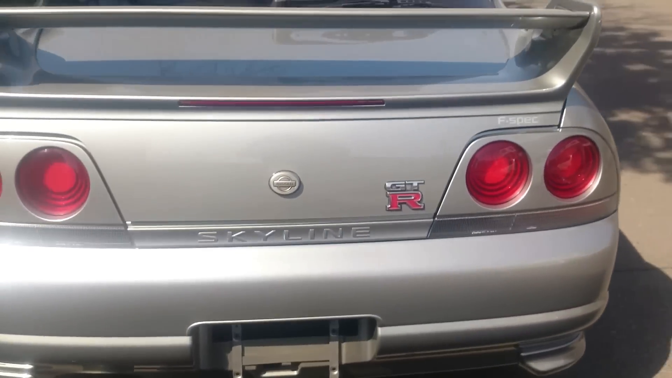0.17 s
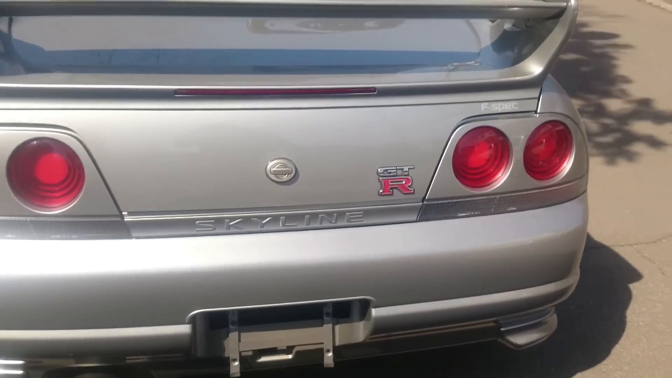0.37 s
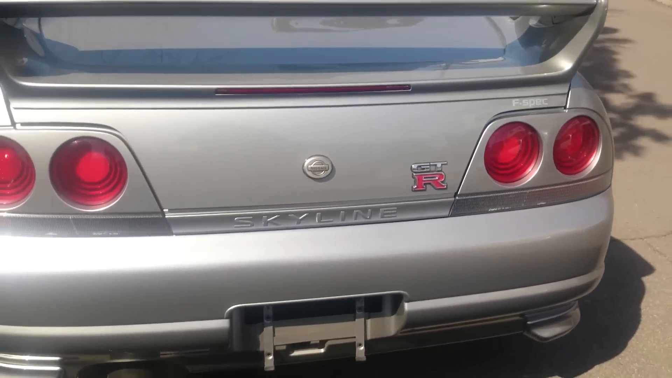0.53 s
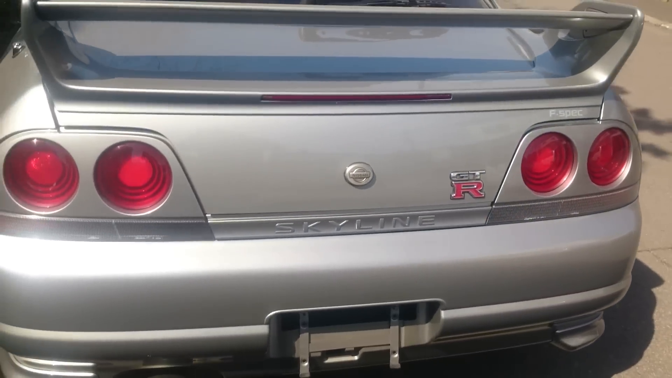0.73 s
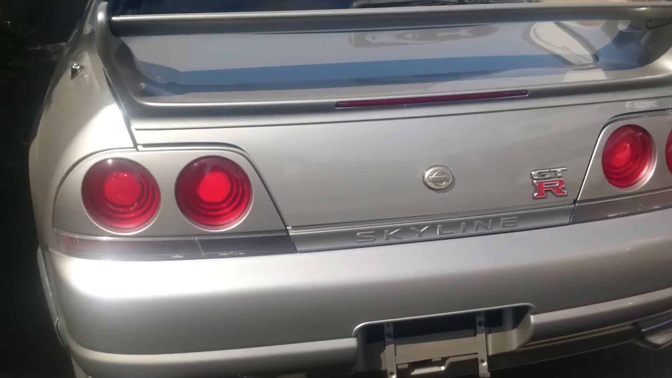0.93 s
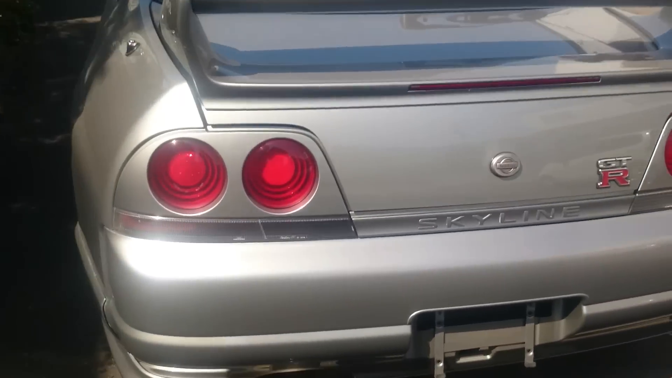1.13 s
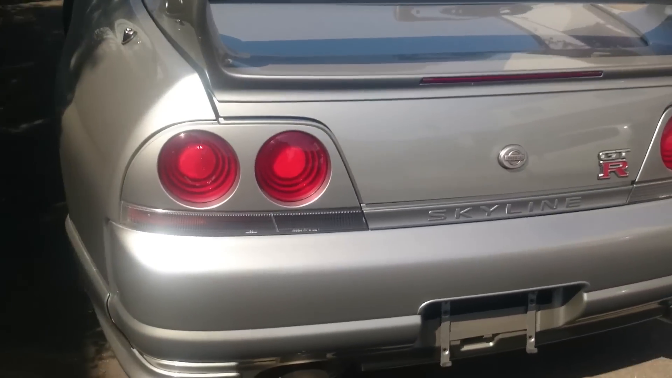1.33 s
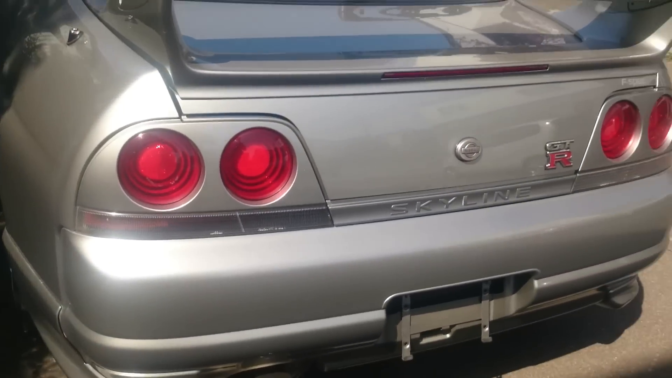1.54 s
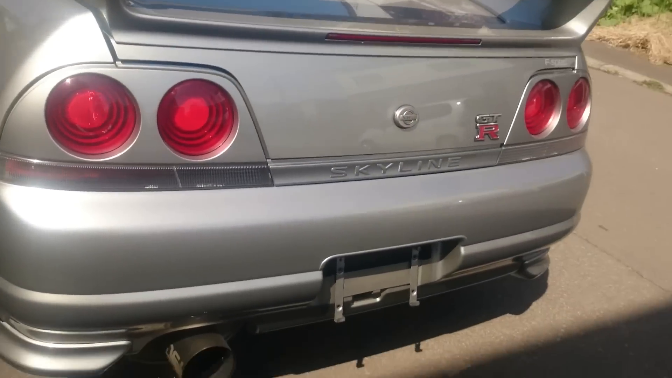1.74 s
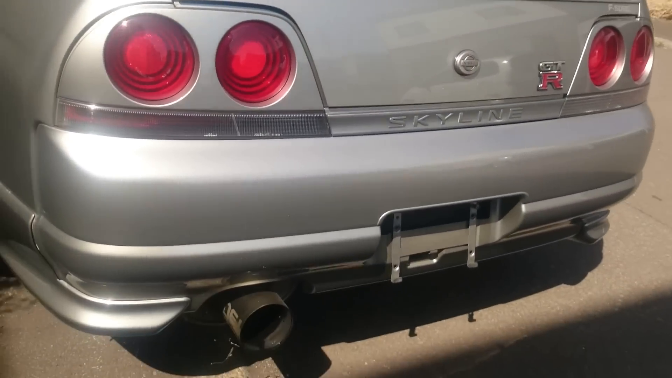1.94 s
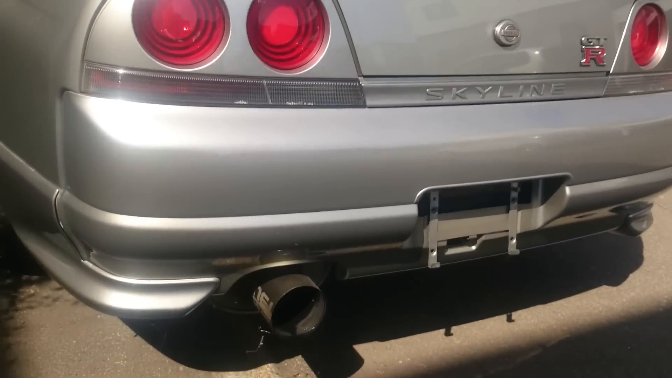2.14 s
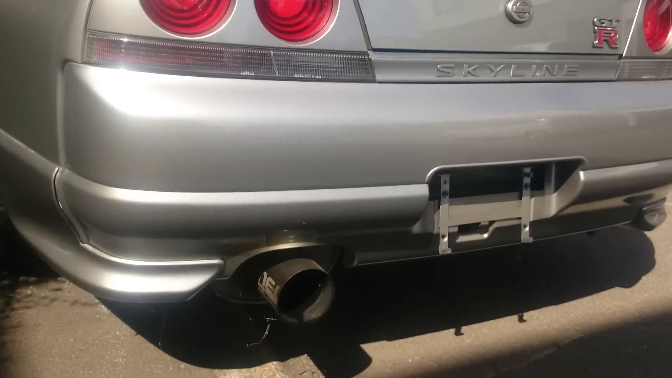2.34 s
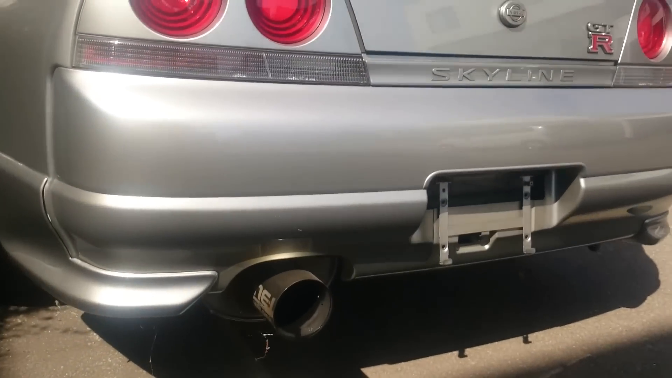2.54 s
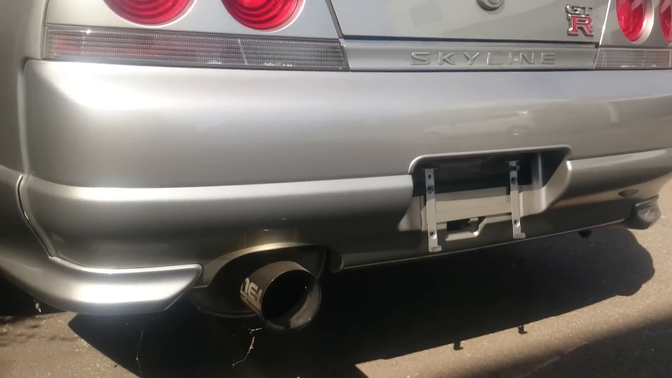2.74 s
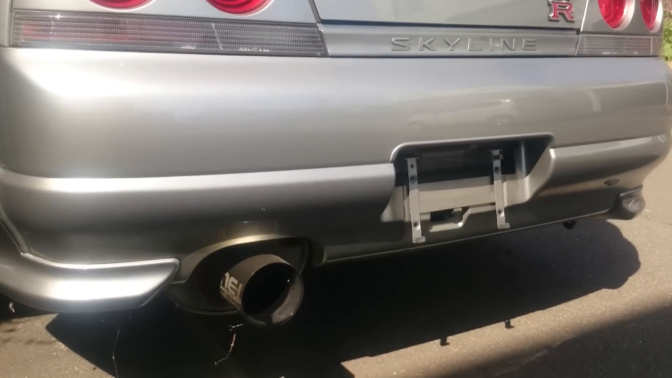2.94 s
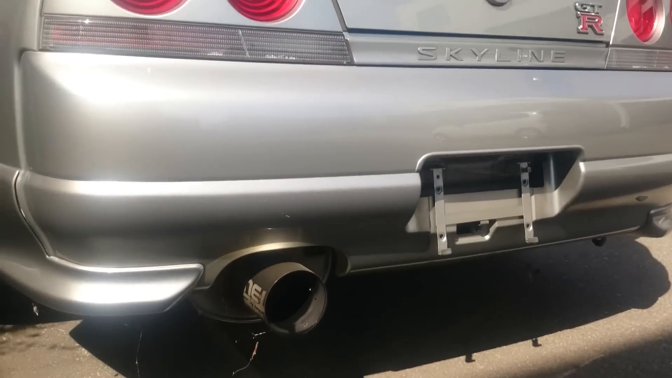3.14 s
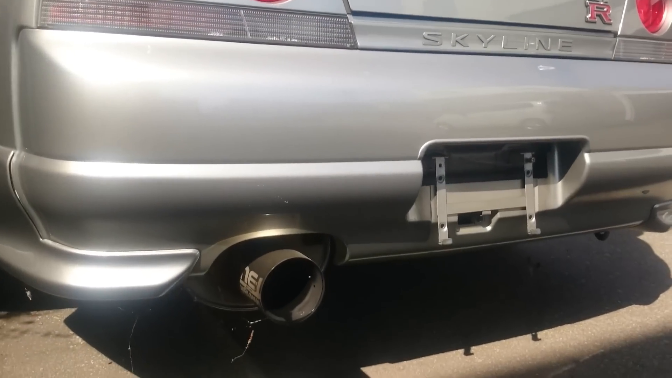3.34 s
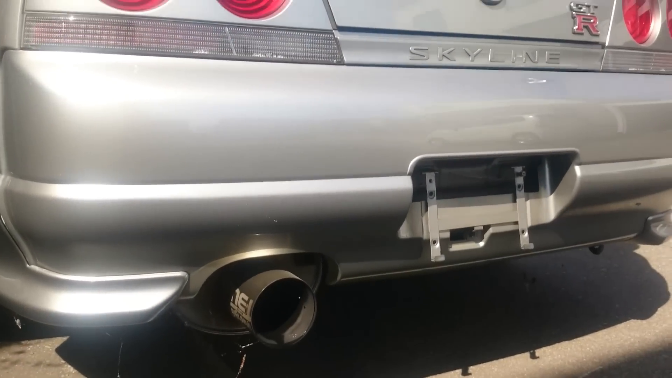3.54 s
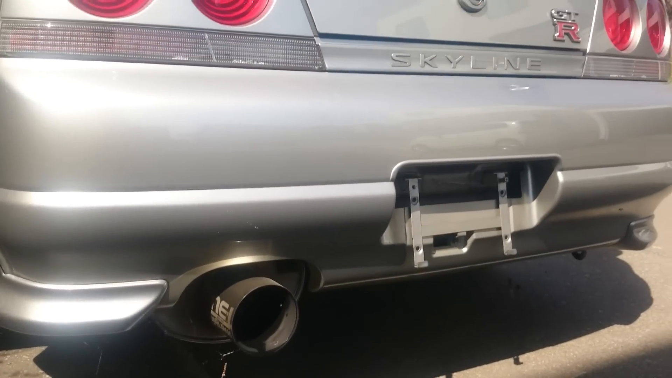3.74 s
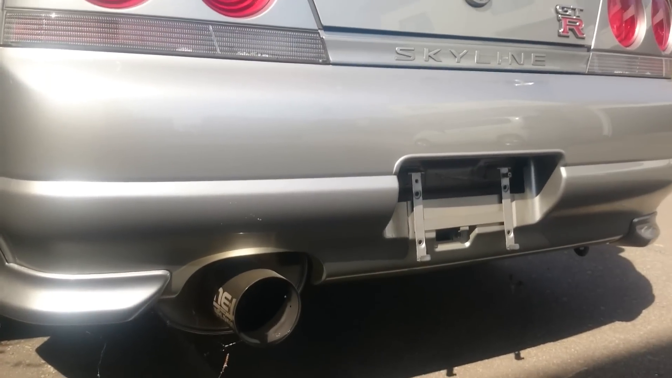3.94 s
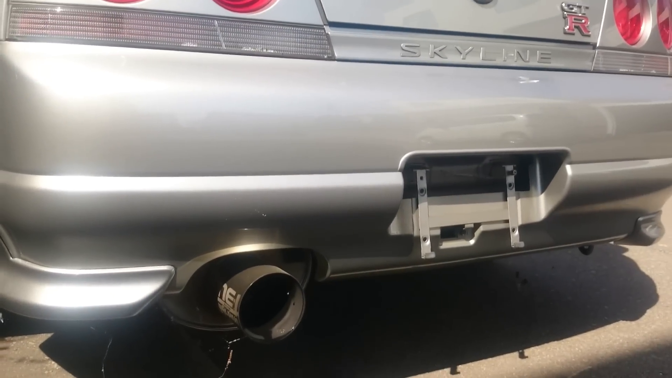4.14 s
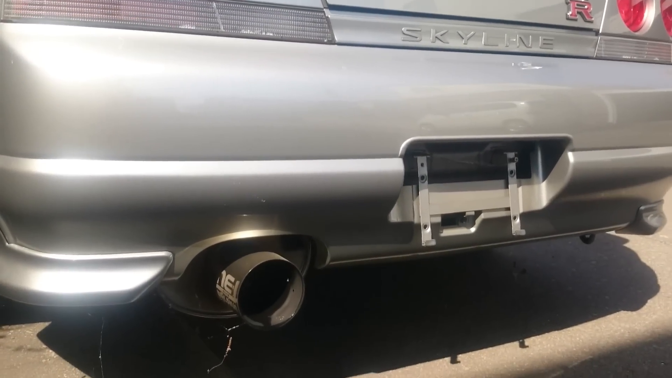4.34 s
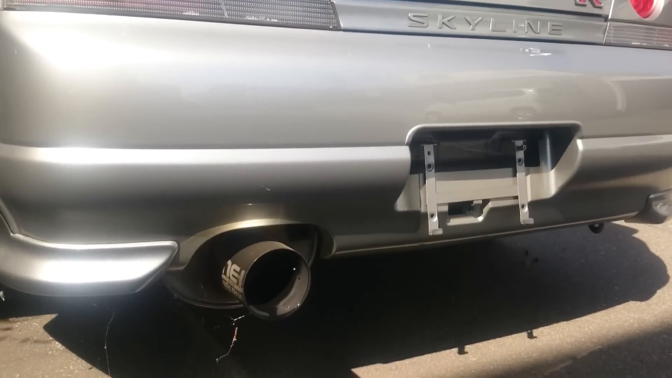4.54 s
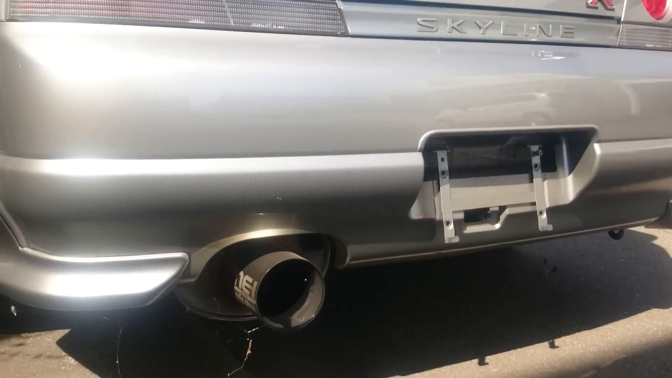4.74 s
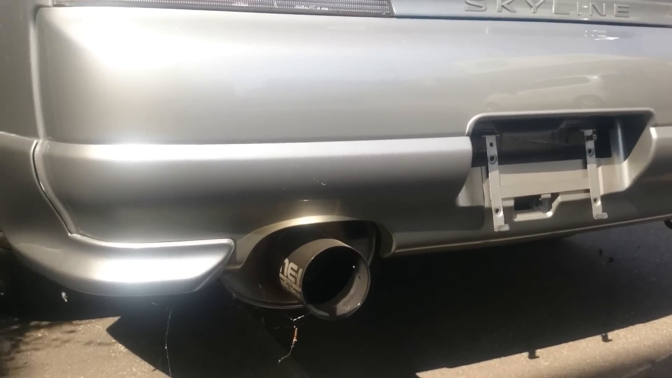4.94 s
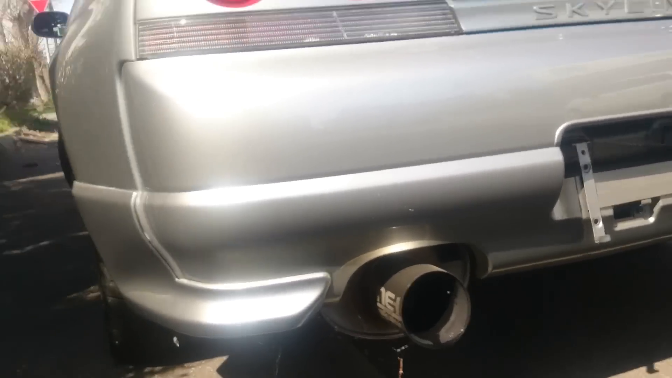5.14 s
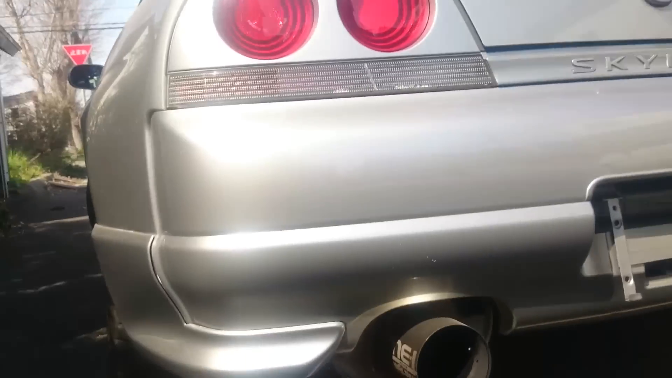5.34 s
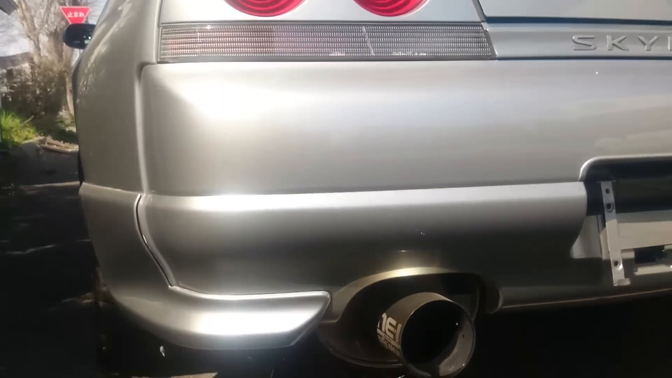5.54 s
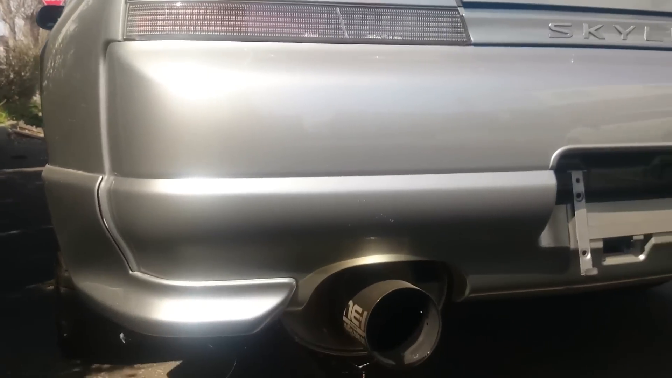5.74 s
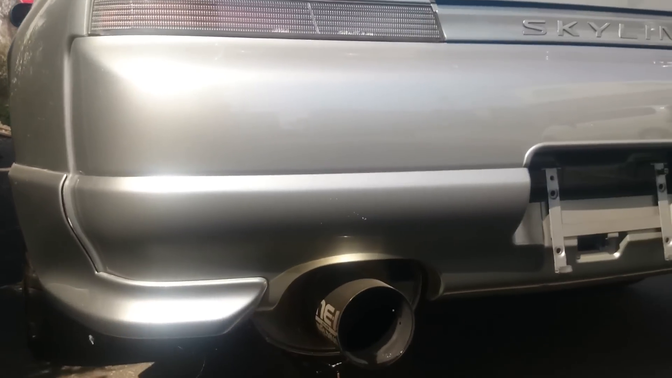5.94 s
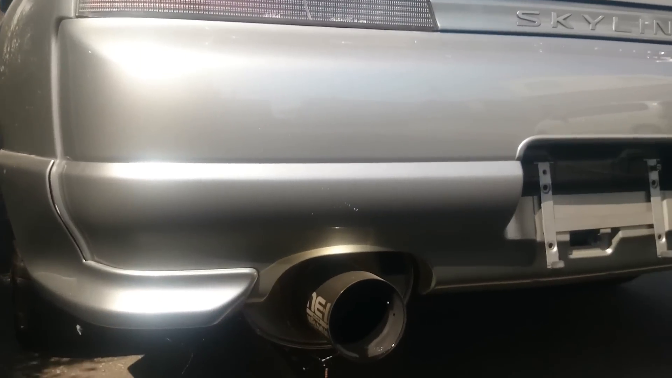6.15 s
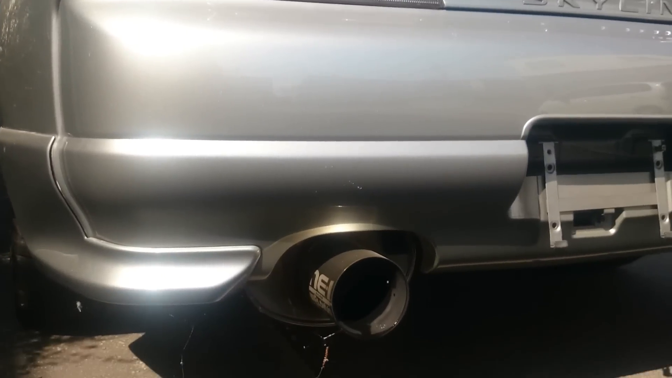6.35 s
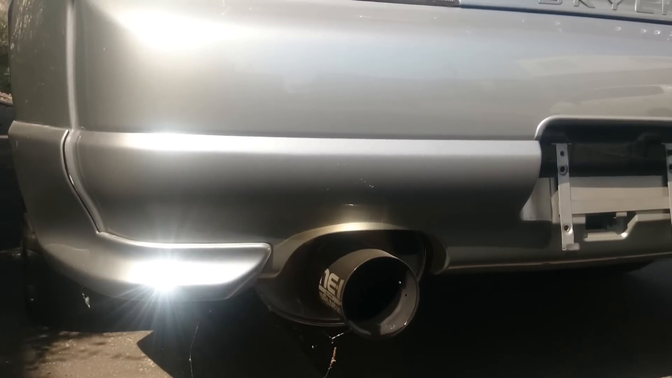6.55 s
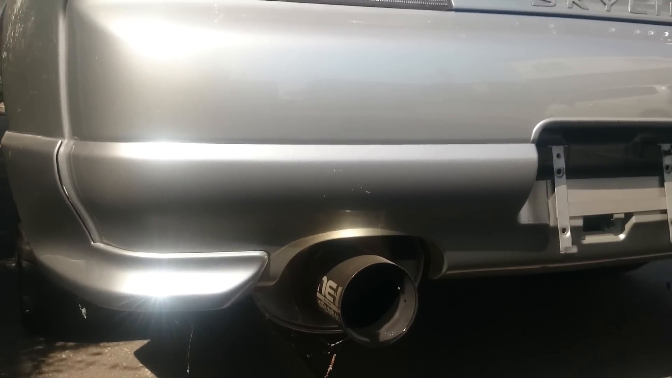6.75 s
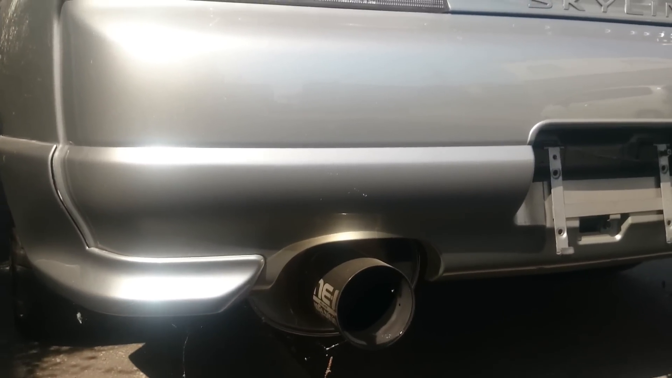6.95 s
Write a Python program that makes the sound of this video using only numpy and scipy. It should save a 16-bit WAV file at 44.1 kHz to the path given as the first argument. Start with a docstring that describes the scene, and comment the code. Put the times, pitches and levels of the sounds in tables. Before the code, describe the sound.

Close handheld stereo, outdoors on hard gritty ground: a deep loping idle at the tailpipe, sandy scuffs and a thin sole squeak in the first two seconds, then a short gear whine. The engine picks up, grows louder and smoother, with ticking and rushing gas that swells and sinks. A cluster of handling knocks, mostly left, precedes the closest steady drone; the left side is otherwise muffled.

```python
"""A straight-six idles, heard from behind its tailpipe; near 2.8 s the loping idle picks up and firms.
The exhaust repeats one cycle of pressure waves plus pulsing turbulence; valve gear ticks under a rush of gas.
A person with a camera scuffs gritty concrete and shifts about: filtered noise under short envelopes.
The lens motor whines once in tooth-rate harmonics, and knocks strike the camera.
The left microphone is muffled over most of the range."""
import sys
import numpy as np
from scipy import signal
from scipy.fft import rfft, irfft, next_fast_len
from scipy.io import wavfile

SR = 44100
rng = np.random.default_rng(int(sys.argv[2]) if len(sys.argv) > 2 else 0)


def master_out(mix):
    """Clip the mix to full scale and print it as 16-bit PCM to the path in sys.argv[1]."""
    frames = np.transpose(np.atleast_2d(mix))
    ceiling = np.clip(frames, -1, 1)
    pcm = np.round(ceiling * 32767).astype(np.int16)
    wavfile.write(sys.argv[1], SR, pcm)


N = 308259
TIME = np.arange(N) / SR
SIZE = 2 * next_fast_len(N // 2 + SR // 10)
HZ = np.arange(SIZE // 2 + 1) * SR / SIZE

# idle control lifts the low idle to a high one
LOW_IDLE_RPM, HIGH_IDLE_RPM = 928.85, 967.97
PICKUP_S, PICKUP_RISE_S = 2.709, 0.222
# rush and sizzle swell and sink once while the listener crouches: peak, half width
SWELL_S, SWELL_WIDTH_S = 4.4, 0.82


def from_db(db):
    """Decibels to gain."""
    return 10 ** (np.asarray(db) / 20)


def rms_one(x):
    """Scale to unit power."""
    return x / np.sqrt(np.mean(x ** 2) + 1e-20)


def at_hz(points, hz):
    """Read a spectrum on a log-frequency axis."""
    f, value = np.transpose(points)
    return np.interp(np.log(hz + 1e-3), np.log(f), value)


def ramp(start_s, length_s):
    """Straight rise from 0 to 1."""
    return np.clip((TIME - start_s) / length_s, 0, 1)


def hump(peak_s, width_s):
    """Bell-shaped swell of height 1."""
    return np.exp(-((TIME - peak_s) / width_s) ** 2)


def burst(start_s, decay_s, rise_s=0.0007):
    """Quick rise and exponential fall."""
    age = np.maximum(TIME - start_s, 0)
    return (1 - np.exp(-age / rise_s)) * np.exp(-age / decay_s)


def drift(rate_hz):
    """Slow random wandering, rms 1."""
    knots = rng.standard_normal(int(N / SR * rate_hz) + 2)
    return rms_one(np.interp(TIME * rate_hz, np.arange(len(knots)), knots))


def causal(gain):
    """Complex response of a passive body with these gains: nothing rings before it is struck."""
    cepstrum = irfft(np.log(gain))
    half = len(cepstrum) // 2
    cepstrum[1:half] *= 2
    cepstrum[half + 1:] = 0
    return np.exp(rfft(cepstrum))


def colour(x, db):
    """Filter by a gain in dB at every frequency."""
    return irfft(rfft(x, SIZE) * causal(from_db(db)))[..., :N]


def noise(spectrum, grain_db=0, echo_s=0, echo=0):
    """Stereo noise of rms 1, less alike in the treble; grain crackles, a repeating echo ripples the spectrum."""
    # Each row: frequency in Hz, likeness of the two channels.
    likeness = [(100, 0.69), (300, 0.7), (700, 0.81), (2500, 0.45), (5000, 0.24), (14000, 0.22)]
    specks = np.minimum(rng.exponential(1, N // 10 + 1), 4)
    grain = from_db(grain_db * specks).repeat(10)[:N]
    mid, side = rfft(rng.standard_normal((2, N)) * grain, SIZE)
    alike = at_hz(likeness, HZ)
    pair = np.sqrt(1 + alike) * mid + np.sqrt(1 - alike) * side * [[1], [-1]]
    low_cut = np.minimum(HZ / spectrum[0][0], 1) ** 2
    ripple = 1 / (1 - echo * np.exp(-2j * np.pi * HZ * echo_s))
    return rms_one(irfft(pair * low_cut * ripple * from_db(at_hz(spectrum, HZ)))[:, :N])


def crank_speed():
    """Low idle hunts ever more widely, is lifted, overshoots and settles in a damped swing (rpm)."""
    hunt_rpm, growth_rpm_per_s, hunt_period_s, crest_s = 4.3, 7.55, 1.704, 1.73
    overshoot_rpm, settle_s, settle_period_s = 56.3, 0.92, 3.55
    swing = hunt_rpm + growth_rpm_per_s * TIME
    low = LOW_IDLE_RPM + swing * np.cos(2 * np.pi * (TIME - crest_s) / hunt_period_s)
    age = np.maximum(TIME - PICKUP_S - PICKUP_RISE_S, 0)
    settling = np.exp(-age / settle_s) * np.cos(2 * np.pi * age / settle_period_s)
    high = HIGH_IDLE_RPM + overshoot_rpm * settling
    return low + (high - low) * ramp(PICKUP_S, PICKUP_RISE_S)


def listener_place():
    """0 standing, 1 crouched, 2 low beside the pipe; each move eases in and out."""
    # Each row: middle of the move in seconds, length in seconds.
    moves = [(2.672, 0.79), (5.237, 0.53)]
    return sum(0.5 - 0.5 * np.cos(np.pi * ramp(middle - length / 2, length)) for middle, length in moves)


def sizzle(rest_db=-68, swell_db=4.5, grain_db=2.5):
    """Thin high hiss that swells with the rush, and rustles when the person shifts."""
    # Each row: frequency in Hz, level in dB.
    sizzle_colour = [(6000, -33), (9000, -3), (12000, -2.5), (14200, 5.5), (15700, -7)]
    # Each row: start of the fade in seconds, peak in dB, time to swell and to fade in seconds.
    rustle_rows = [(.27, -55, 0.35), (1.1, -47.5, 0.18), (1.5, -52, 0.8), (5.25, -50, 0.21)]
    steady = from_db(rest_db + swell_db * hump(SWELL_S, SWELL_WIDTH_S))
    rustles = [from_db(db) * np.exp(-abs(TIME - s) / width) for s, db, width in rustle_rows]
    return np.linalg.norm([steady, *rustles], axis=0) * noise(sizzle_colour, grain_db)


def zoom_motor(flutter=0.00332, waver_db=1.5, mesh=0.3, alike=0.63):
    """Small gears whine at multiples of their tooth rate and hiss as the teeth slide."""
    # Each row: multiple of the tooth rate, level in dB.
    whine_lines = [(2.05, -10.5), (4, -18), (5, -5.5), (6, -8), (7, 2.5), (8, -4), (9, -1), (16, -13),
                   (17, -19), (19, -11), (20, -9), (21.5, 3), (22, 5.5), (23, 4), (24, -5), (25, -2)]
    # Each row: frequency in Hz, level in dB.
    gear_colour = [(2500, -21), (4500, -10), (6000, -25.5), (8000, -25), (9000, -10.5), (10500, -12.5),
                   (11700, -10.5), (12400, -2.5), (13200, -7.5), (14400, -6), (15500, -23)]
    start_s, ease_s, stop_s = 2.01, 2.61, 3.06
    attack_s, release_s, whine_delay_s = 0.077, 0.075, 0.047
    start_tooth_hz, sag_hz_per_s2 = 576.4, 24
    whine_db, whine_fade_db_per_s = -39.5, 30
    hiss_db, hiss_swell_db, hiss_swell_width_s = -41.5, 2, 0.23

    tooth_hz = start_tooth_hz - sag_hz_per_s2 * (np.clip(TIME, start_s, stop_s) - start_s) ** 2
    turn = 2 * np.pi * np.cumsum(tooth_hz * (1 + flutter * drift(150))) / SR
    whine = rms_one(sum(from_db(db + waver_db * drift(20)) * np.sin(k * turn) for k, db in whine_lines))
    # every second tooth slides alike, so the hiss gathers into fine lines
    sliding = []
    for side in noise(gear_colour, grain_db=1.0):
        repeats = [alike ** k * np.interp(TIME - 2 * k / tooth_hz, TIME, side) for k in range(4)]
        sliding.append(sum(repeats))
    hiss = rms_one(np.array(sliding)) * (1 + mesh * np.cos(turn))

    running = ramp(start_s, attack_s) * (1 - ramp(stop_s - release_s, release_s))
    eased_s = np.maximum(TIME - ease_s, 0)
    # the teeth bite a moment after the start; the whine fades once the motor eases off
    whine_gain = ramp(start_s + whine_delay_s, attack_s) * from_db(whine_db - whine_fade_db_per_s * eased_s)
    hiss_gain = from_db(hiss_db + hiss_swell_db * hump(ease_s, hiss_swell_width_s))
    return running * (whine_gain * whine + hiss_gain * hiss)


def bumps(rise_share=0.13):
    """A finger knocks the camera case near the left microphone; each knock has its own hardness."""
    # Each row: start in seconds, level in dB, decay in seconds, hardness (low-pass) in Hz,
    # left minus right in dB.
    knock_rows = [(5.2413, -9.5, 0.001, 14000, 11), (5.2444, -9.5, 0.0015, 7000, 14),
                  (5.272, -29, 0.02, 12000, 20), (5.297, -31, 0.004, 2200, 6),
                  (5.3044, -9, 0.0031, 900, 17.5)]
    # Each row: frequency in Hz, level in dB.
    case_colour = [(150, 19), (300, 5.5), (550, 9), (900, -10.5), (2500, -9), (5200, -5.5), (7500, -19),
                   (9000, -10), (15000, -17)]
    case, out = noise(case_colour), 0
    for s, db, decay, hz, pan_db in knock_rows:
        gain = from_db(db + pan_db * np.array([[0.5], [-0.5]]))
        knock = case * gain * burst(s, decay, rise_share * decay)
        out = out + signal.sosfilt(signal.butter(1, hz, fs=SR, output="sos"), knock)
    return out


def twist(peak_s=1.12, level_db=-45, width_s=0.1):
    """Sand squeals thinly under a turning sole: grainy noise that swells and fades."""
    # Each row: frequency in Hz, level in dB.
    squeal_colour = [(4800, -27), (5700, -1), (6800, -3), (7800, -22), (15000, -40)]
    return from_db(level_db) * np.exp(-abs(TIME - peak_s) / width_s) * noise(squeal_colour, grain_db=5.0)


def footsteps(grain_db=3.5, ring_cycles=3.2, grit_db=-5, spread=1.226):
    """Soles drag over sand, and single stones crack with a short dull ring."""
    # Each row: start in seconds, level in dB, decay in seconds.
    scuffs = [(0.109, -25.5, 0.019), (0.136, -37, 0.12), (1.005, -34, 0.022), (1.274, -43, .03),
              (1.563, -32.5, 0.024), (1.715, -24, 0.016), (1.746, -31, 0.015), (1.925, -34, 0.018),
              (1.934, -34, 0.042), (1.972, -38, 0.032)]
    # Each row: frequency in Hz, level in dB.
    sole_colour = [(300, 0), (1000, -9), (2000, 2.5), (2800, 3.5), (4000, -3), (5200, 2.5), (7500, -11.5),
                   (9200, -5), (11500, -11.5), (14000, -4), (15700, -17)]
    # Each row: start in seconds, level in dB (before grit_db), pitch in Hz.
    stones = [(0.1842, -21, 1900), (.1925, -21.5, 1900), (1.012, -26.5, 1690), (1.027, -27.5, 1850),
              (1.111, -35, 5800), (1.204, -31, 726), (1.449, -30.5, 625), (1.568, -26, 5000),
              (1.596, -29.5, 1390), (1.608, -28, 570), (1.727, -23.5, 2190), (1.734, -25, 1490),
              (1.747, -26, 1690), (1.757, -29, 1370), (1.932, -30, 480), (1.957, -27, 1870),
              (1.973, -21.5, 2330), (1.979, -20, 2220), (1.987, -19, 1800), (2.015, -34, 626),
              (2.896, -24, 3120), (2.99, -24, 517)]
    out = noise(sole_colour, grain_db) * sum(from_db(db) * burst(s, decay) for s, db, decay in scuffs)
    age = np.arange(SR // 20) / SR
    for s, db, hz in stones:
        crack = rng.standard_normal(len(age)) * np.exp(-age / max(ring_cycles / hz, 0.002))
        band = signal.butter(2, [hz / spread, hz * spread], "band", fs=SR, output="sos")
        crack = rms_one(signal.sosfilt(band, crack)) / np.sqrt(20)
        at = round(s * SR)
        out[:, at:at + len(age)] += from_db(db + grit_db) * crack
    return out


def valve_ticks(cycle, first_slot=0.013, decay_s=0.0028, rise_s=0.0018, scatter_db=1.5):
    """Envelope of twelve ticks a cycle; one loose valve stands out on every crank turn."""
    # Levels in dB of the six ticks of a crank turn.
    valves_db = [-1, 0, 0.5, -1.5, -8, 9.5]
    slot = np.floor(12 * (cycle - first_slot)).astype(int)
    at = np.flatnonzero(np.diff(slot)) + 1
    tick_db = np.array(valves_db)[slot[at] % len(valves_db)]
    hits = np.zeros(N)
    hits[at] = from_db(tick_db + scatter_db * rng.standard_normal(len(at)))
    return signal.fftconvolve(hits, burst(0, decay_s, rise_s)[:SR // 20])[:N]


def rush(cycle, place, surge, far_tick_db=-8, near_tick_db=3.0, smooth_db=-3.0, flutter_db=1.69):
    """Gas and machinery hiss, changing colour with the listener's place; ticking carries under the car."""
    # Levels in dB standing, crouched and beside the pipe.
    rush_db = [-42.5, -45, -42.5]
    # Hiss at the three places, then the valve ticks. Each row: frequency in Hz, level in dB.
    standing = [(220, -10), (380, 1.5), (451, -8), (560, 0), (1010, -3.5), (1340, -7.5), (1610, -3.5),
                (2130, -3), (2950, -2), (4080, -10), (4770, -6.5), (5480, -5.5), (7950, -21),
                (13900, -26.5), (15500, -12.5)]
    crouched = [(220, -59), (380, -3), (518, 3.5), (707, -7), (1580, -6), (1740, -10), (2130, -1.5),
                (2520, 0), (2770, -7.5), (3340, -3.5), (3720, -14), (4990, -7.5), (6300, -22), (9000, -20),
                (15500, -35)]
    beside = [(220, -27), (380, -1.5), (560, -3.5), (615, -10.5), (644, -9.5), (920, -11.5), (1360, -11.5),
              (2130, -18), (2730, -18.5), (3390, -20.5), (5230, -6), (7140, -29.5), (11700, -64.5),
              (14100, -55), (15500, -39)]
    tick_colour = [(900, -3.5), (1300, 4), (1800, -7.5), (2300, 1.5), (2800, -11.5), (3400, 3), (4100, -1),
                   (5000, -0.5), (6200, -11.5), (8000, -21), (9200, -14), (15000, -49)]
    surge_db, swell_db = 6.5, 5.5
    # the hiss carries fine, evenly spaced ripples, spaced differently at each place: (delay s, strength)
    echoes = [(0.00204, 0.32), (0.00475, 0.22), (0.00372, 0.2)]

    level_db = np.interp(place, [0, 1, 2], rush_db) + surge_db * surge
    level_db = level_db + swell_db * hump(SWELL_S, SWELL_WIDTH_S)
    hiss = 0
    for k, (spectrum, (delay_s, strength)) in enumerate(zip((standing, crouched, beside), echoes)):
        weight = np.sqrt(np.clip(1 - abs(place - k), 0, 1))
        hiss = hiss + weight * noise(spectrum, echo_s=delay_s, echo=strength)
    hiss = hiss * from_db(smooth_db + flutter_db * drift(25))
    tick_gain = from_db(np.interp(place, [0, 1], [far_tick_db, near_tick_db]))
    ticks = valve_ticks(cycle) * tick_gain * noise(tick_colour)
    return from_db(level_db) * (hiss + ticks)


def pipe_tone(orders, cycle, weak_db=-24, weak_slope_db=1.52):
    """One four-stroke cycle of pressure waves leaving the pipe, repeated as the crank turns; rms 1."""
    order = np.arange(41)
    # orders that are not listed
    levels_db = np.where(order < 6, -36, weak_db - weak_slope_db * (order - 6))
    for k, db in orders:
        levels_db[k] = db
    wave = rms_one(irfft(causal(from_db(levels_db)) * (order > 0), 2048))
    return np.interp(cycle % 1, np.linspace(0, 1, len(wave), endpoint=False), wave)


def exhaust(cycle, rpm, place, surge, loping_lag=0.352, firm_lag=0.3003, rumble_db=-17, calming_db=6,
            boom_per_rpm=0.026, boom_hz=70):
    """Uneven cylinders make the pipe throb; no two firings burn alike, and each stirs up turbulence."""
    # Levels in dB standing, crouched and beside the pipe.
    exhaust_db = [-24, -16.5, -16]
    # Tone of each idle. Each row: multiple of the cycle rate (every sixth is a firing order), level in dB.
    loping = [(1, -41), (2, -24), (3, -39.5), (4, -28.5), (5, -25.5), (6, 0.5), (7, -13.5), (8, 0),
              (9, 1.5), (10, -6.5), (11, -25), (12, -2.5), (13, -21.5), (14, -19.5), (15, -32), (16, -18),
              (17, -32.5), (18, -6.5), (19, -33), (20, -16.5), (21, -13), (22, -18), (23, -23.5), (24, -9),
              (25, -39.5), (26, -32.5), (27, -27), (28, -42), (29, -40), (30, -17.5), (31, -32),
              (32, -27.5), (33, -14), (34, -38.5), (35, -31), (36, -16.5), (37, -33), (38, -39), (39, -28),
              (40, -31.5)]
    firm = [(6, 2), (7, -23.5), (8, -3.5), (9, -5.0), (10, -15.0), (12, 1), (14, -39), (16, -18.5),
            (18, -8.5), (20, -21.5), (21, -13.5), (22, -35.5), (24, -13.5), (27, -33.5), (30, -25),
            (33, -26), (36, -28.5)]
    # Turbulence in the pipe. Each row: frequency in Hz, level in dB.
    rumble_colour = [(30, -22), (45, -11.5), (70, -3.5), (110, 3.5), (170, -4.5), (280, -6), (350, -16.5),
                     (500, -43), (1500, -79.5)]
    surge_db, labour_db_per_rpm = 4, 0.0671
    load_creep_per_s, firm_load, load_per_rpm = 0.13, 0.89, 0.005

    lifted = ramp(PICKUP_S, PICKUP_RISE_S)
    # load, 0 loping to 1 firm: creeps up, steps up with the pick-up, then follows the speed
    high_load = firm_load + load_per_rpm * (rpm - HIGH_IDLE_RPM)
    load = np.clip((1 - lifted) * load_creep_per_s * TIME + lifted * high_load, 0, 1)
    level_db = np.interp(place, [0, 1, 2], exhaust_db) + surge_db * surge
    # the low idle grows louder whenever the speed sags
    level_db = level_db + (1 - lifted) * labour_db_per_rpm * (LOW_IDLE_RPM - rpm)

    burn = cycle + 0.001 * drift(40)
    tone = (1 - load) * pipe_tone(loping, burn - loping_lag) - load * pipe_tone(firm, burn - firm_lag)
    # loping firings vary the most
    uneven = 1 + (0.15 - 0.1 * load) * drift(30)
    tone = tone / np.sqrt(load ** 2 + (1 - load) ** 2) * uneven
    # above the median speed the firing order runs into the silencer's boom
    boom = boom_per_rpm * np.maximum(rpm - np.median(rpm), 0)
    deep = signal.sosfiltfilt(signal.butter(3, boom_hz, fs=SR, output="sos"), tone)
    tone = (tone + boom * deep) / (1 + boom / 2)

    puffs = 1 + 0.5 * np.cos(12 * np.pi * cycle)  # six a cycle
    rumble = from_db(rumble_db - calming_db * load) * puffs * noise(rumble_colour)
    return from_db(level_db) * (tone + rumble)


def scene():
    """The crank drives exhaust and valves; the person with the camera adds the rest."""
    rpm, place = crank_speed(), listener_place()
    # the pick-up sends one surge of gas down the pipe
    surge = hump(peak_s=2.908, width_s=0.11)
    cycle = np.cumsum(rpm / 120) / SR  # two crank turns each
    person = sizzle() + zoom_motor() + bumps() + twist() + footsteps()
    return person + rush(cycle, place, surge) + exhaust(cycle, rpm, place, surge)


def record(dry):
    """Each microphone has its own colour; the top is cut."""
    # Each row: frequency in Hz, left minus right in dB.
    ports = [(50, -6), (200, -5), (450, -6.5), (1000, -9), (2200, -10.5), (3500, -18), (5100, -25),
             (6300, -11), (8000, -0.5), (9200, 10), (11000, -6.5), (14000, -16), (16000, -30)]
    cutoff_hz = 15800
    tilt_db = at_hz(ports, HZ)
    # left and right gains average to 1
    right_db = 20 * np.log10(2 / (1 + from_db(tilt_db)))
    pair = np.array([colour(dry[0], right_db + tilt_db), colour(dry[1], right_db)])
    return signal.sosfilt(signal.ellip(12, 0.1, 90, cutoff_hz, fs=SR, output="sos"), pair)


dry = scene()
out = record(dry)
master_out(out)
```